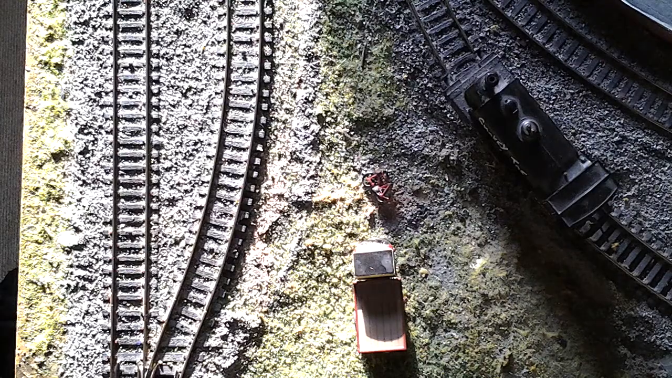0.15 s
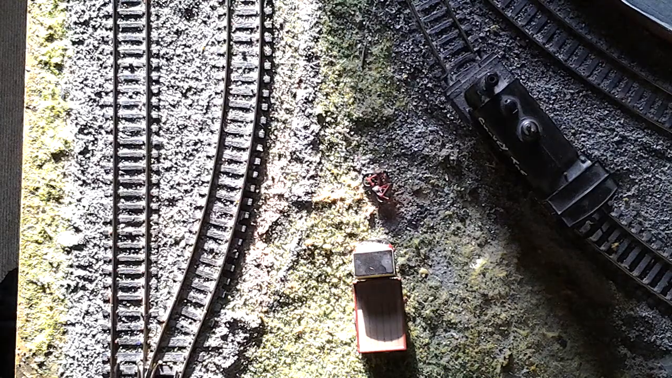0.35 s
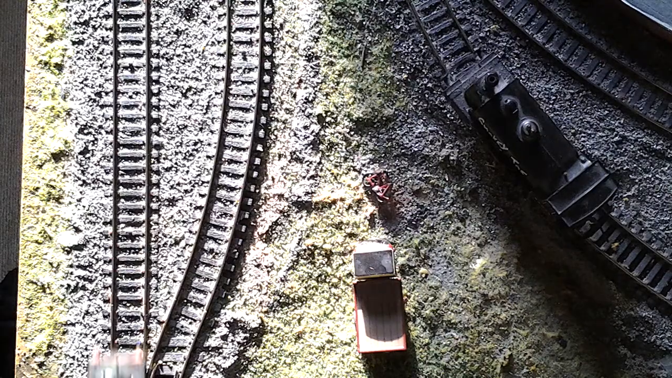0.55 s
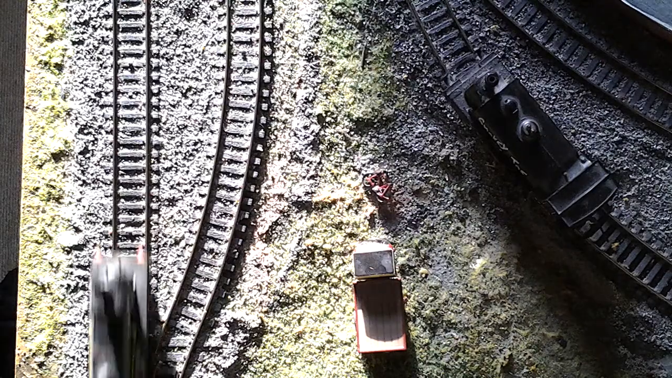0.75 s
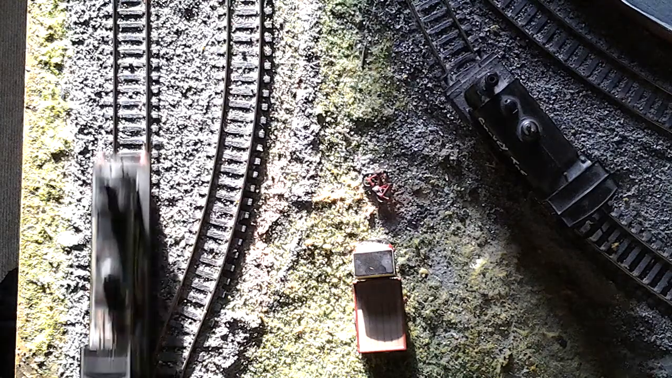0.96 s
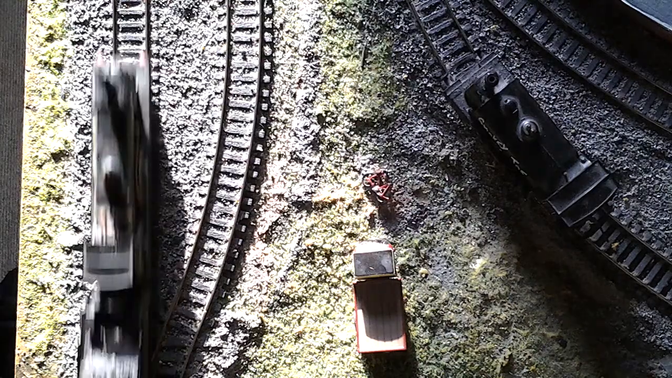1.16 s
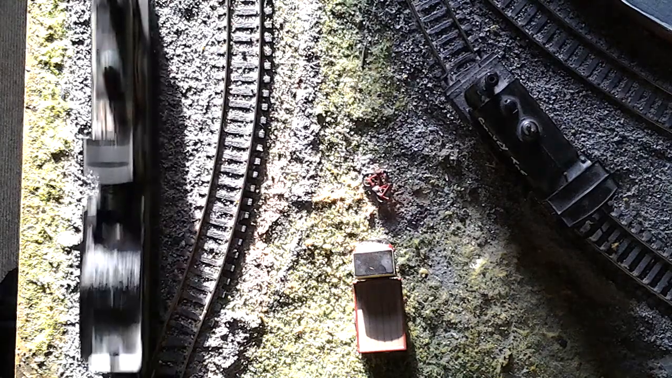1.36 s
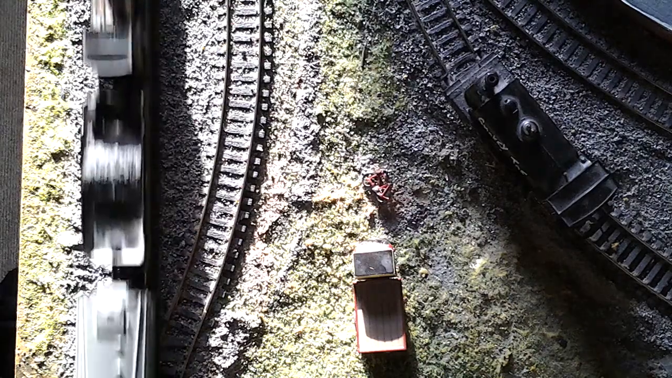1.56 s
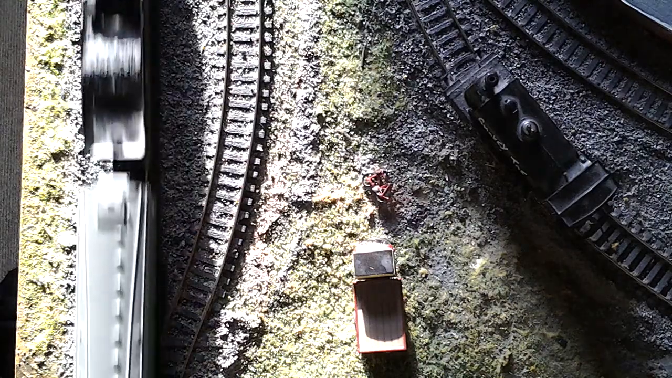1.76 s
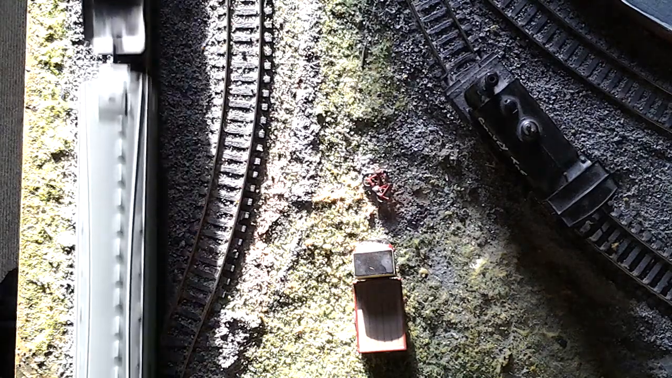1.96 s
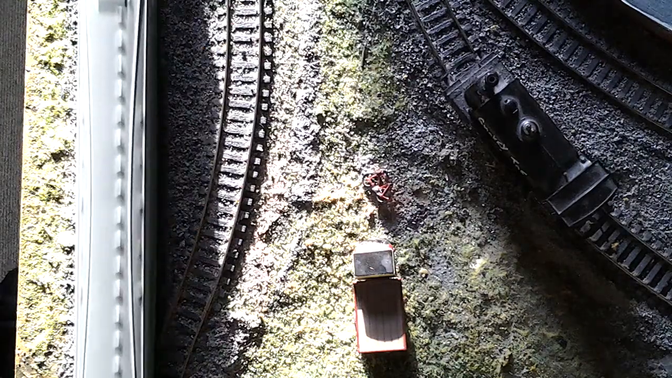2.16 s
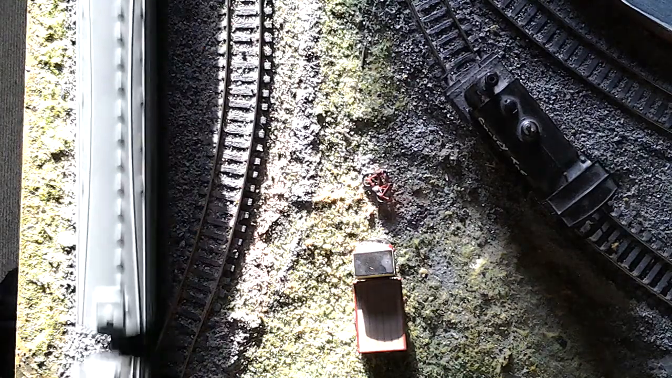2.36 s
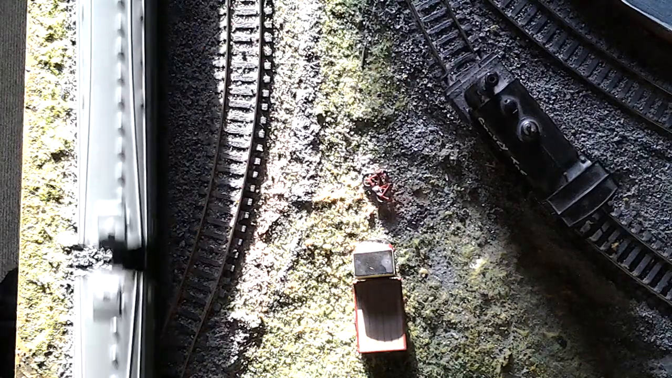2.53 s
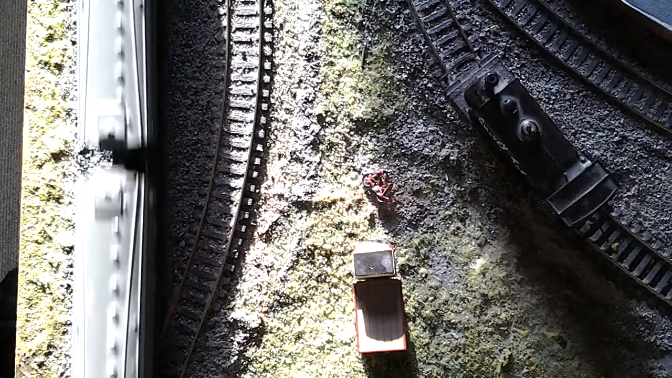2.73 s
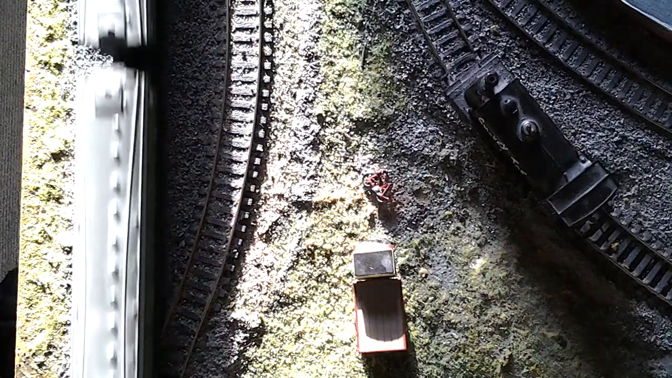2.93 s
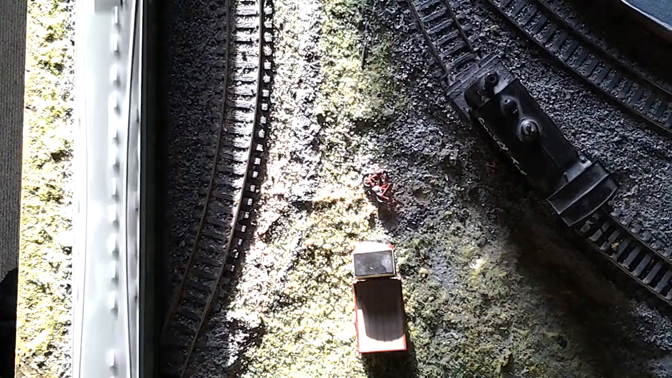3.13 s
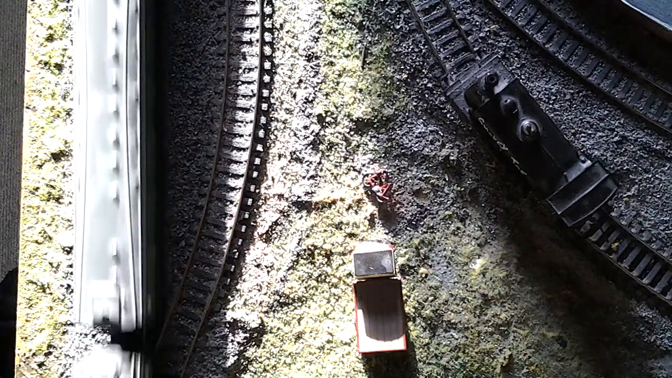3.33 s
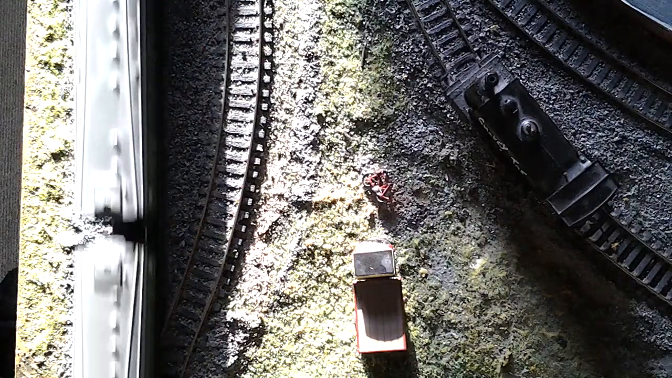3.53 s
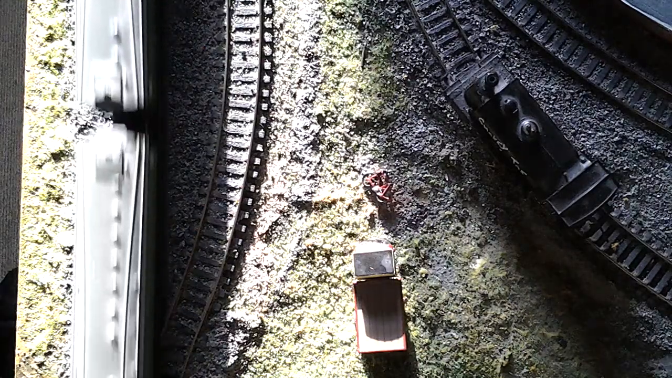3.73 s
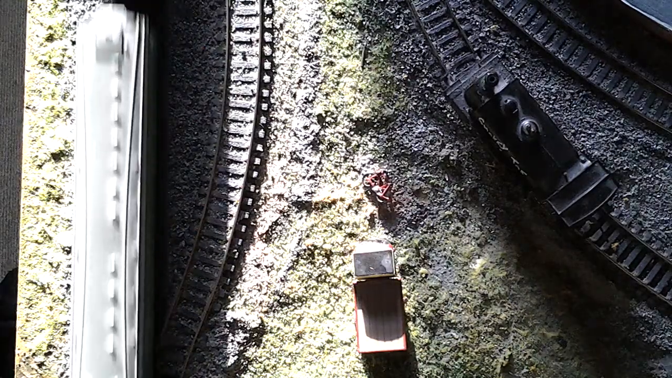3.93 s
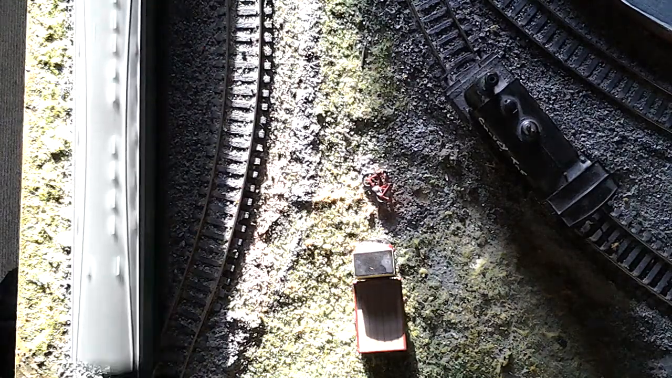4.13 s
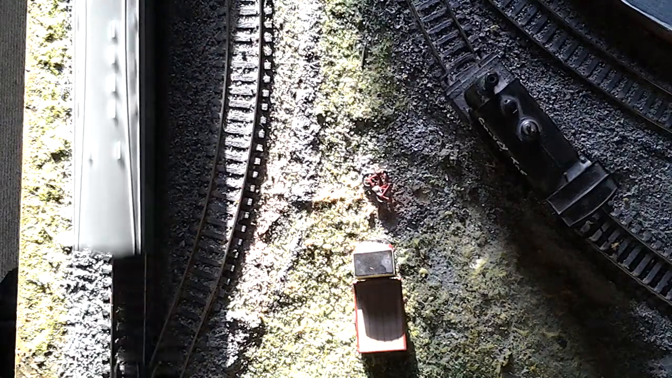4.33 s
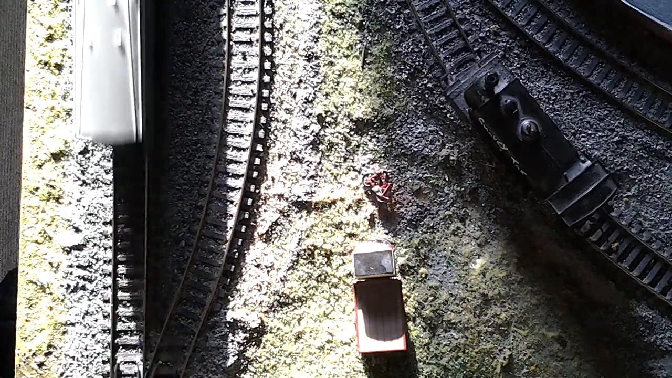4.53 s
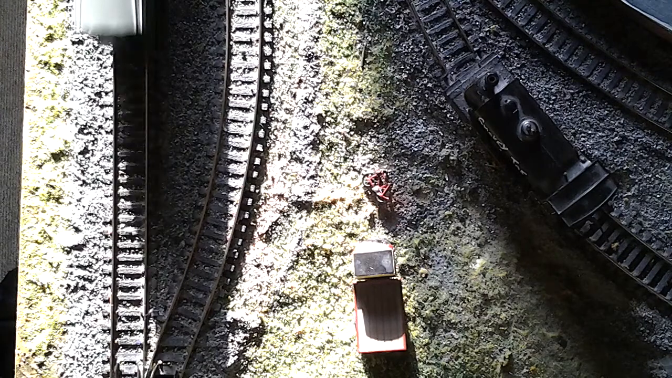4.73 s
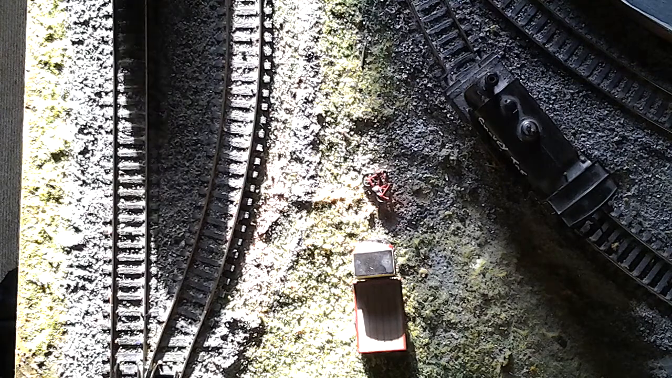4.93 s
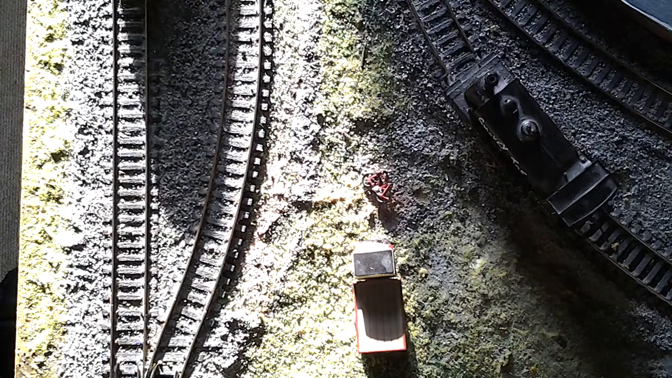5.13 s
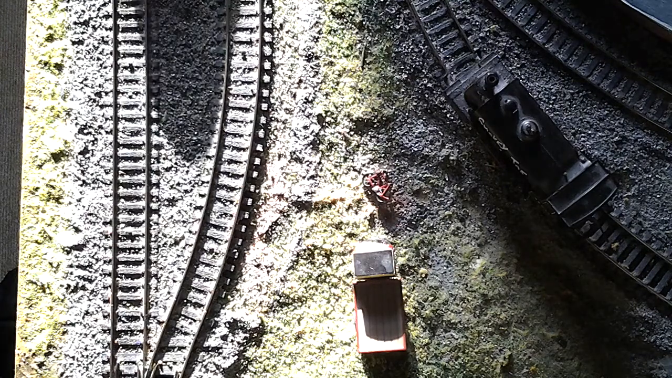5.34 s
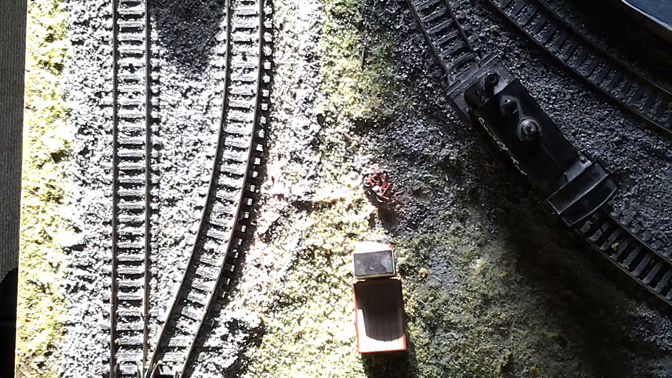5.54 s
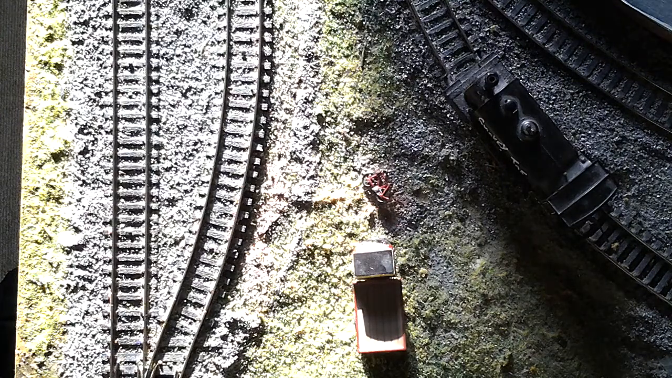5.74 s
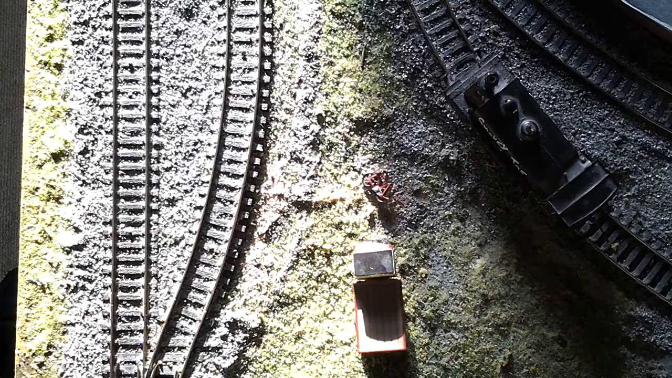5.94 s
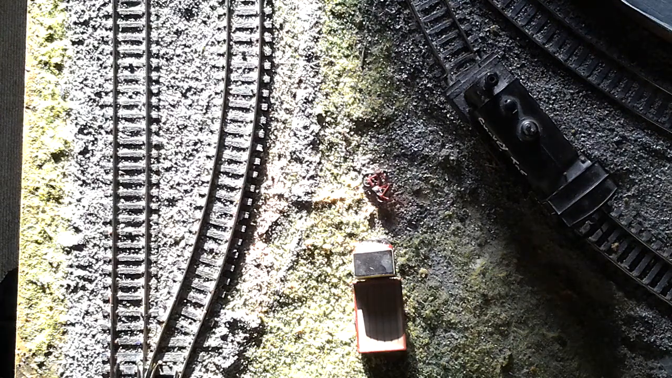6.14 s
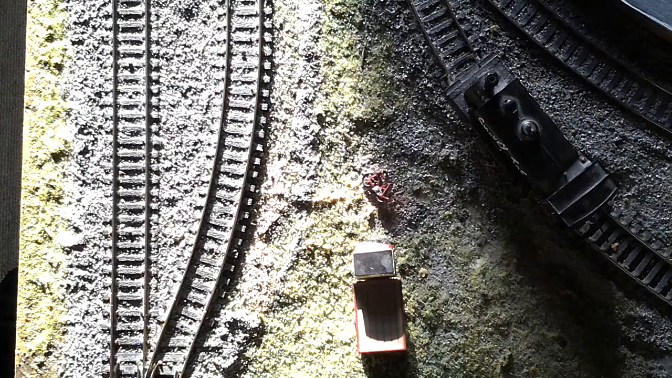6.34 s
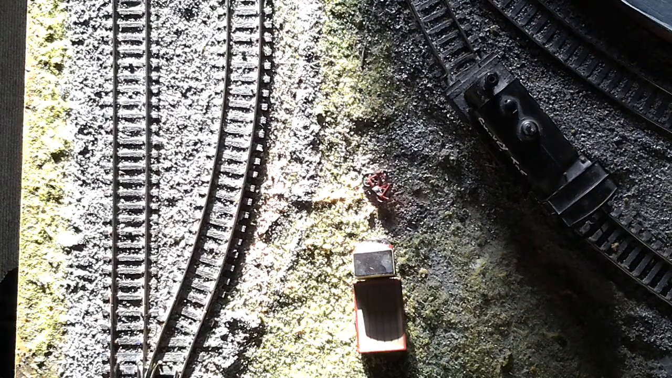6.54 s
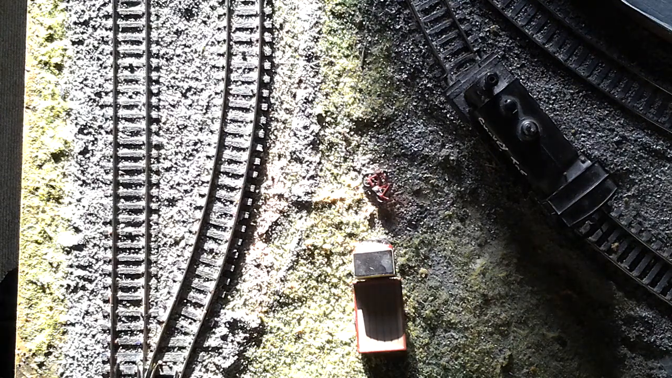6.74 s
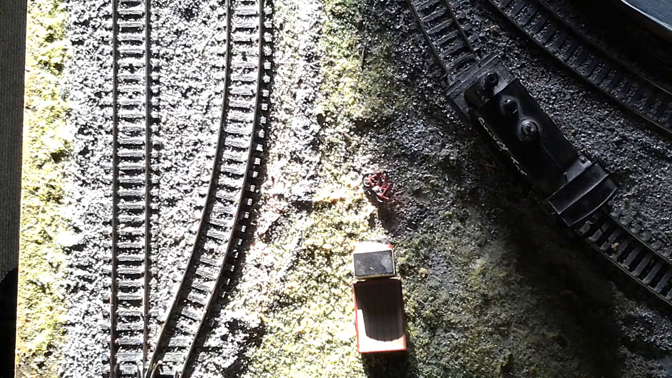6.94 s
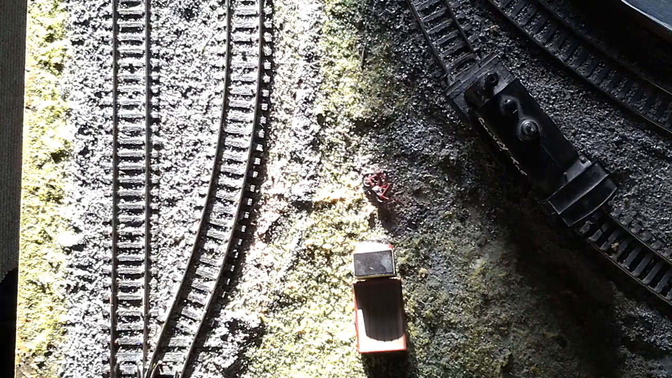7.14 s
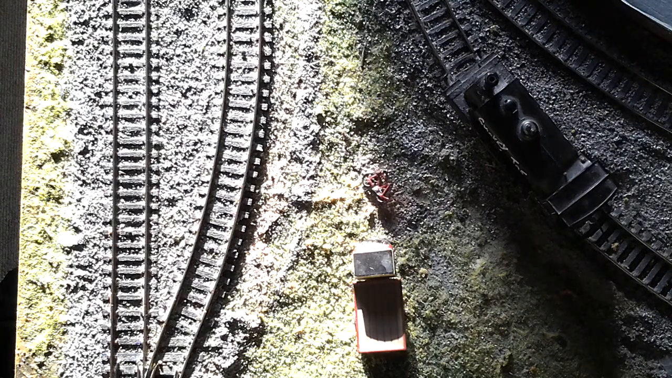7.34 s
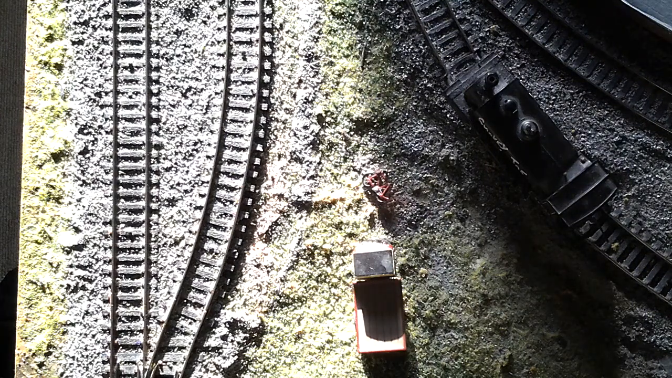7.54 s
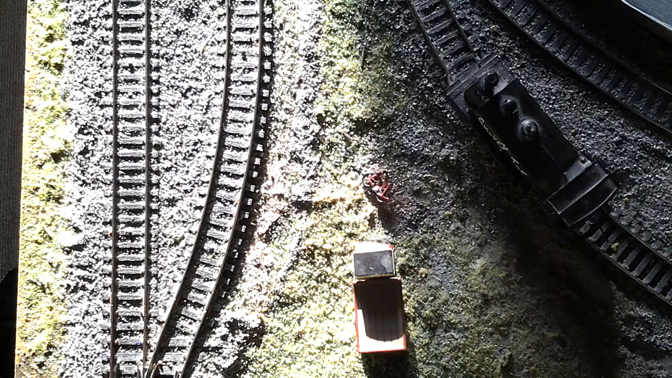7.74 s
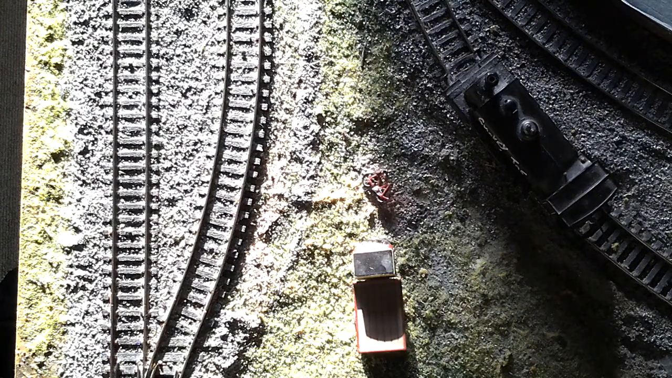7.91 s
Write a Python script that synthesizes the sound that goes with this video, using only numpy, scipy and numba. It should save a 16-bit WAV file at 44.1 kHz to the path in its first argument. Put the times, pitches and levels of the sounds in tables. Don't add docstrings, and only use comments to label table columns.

```python
import sys
import numpy as np
from scipy import signal
from scipy.fft import rfft, irfft, next_fast_len
from scipy.io import wavfile
from scipy.ndimage import uniform_filter1d
from numba import njit

SR = 44100
rng = np.random.default_rng(int(sys.argv[2]) if len(sys.argv) > 2 else 0)


def field_ratio(decibels):
    return 10 ** (np.asarray(decibels, dtype=float) / 20)


def wav_out(sig):
    wavfile.write(sys.argv[1], SR, np.round(np.clip(np.atleast_2d(sig).T, -1, 1) * 32767).astype(np.int16))


N = 356151
END_S = 8.076

# centre_hz, width_hz, level_db
FAR_MODES = [(5570, 2400, 11), (7250, 2600, 0), (9100, 16000, -17)]
# start_s, end_s, pitch_hz, level_db, slide_hz_per_s
FLANGE_SQUEAKS = [
    (0.385, .53, 2470, -38.5, -150),
    (7.93, 8.04, 1900, -44, -2200),
]
# start_s, level_db, ring_hz
JOINT_HOPS = [(0.349, -36, 4200), (0.38, -36, 1930), (0.612, -41, 3800), (0.707, -33, 3800),
              (0.807, -37.5, 1230), (0.851, -36, 4400), (1.248, -32.5, 2680), (1.976, -34, 4620),
              (2.084, -41, 4250), (2.533, -36, 4600), (2.726, -34.5, 756), (3.009, -30.5, 4400),
              (3.041, -31, 3460), (3.053, -29, 5250), (3.61, -29, 1440), (3.945, -33, 2660),
              (4.573, -30.5, 4600), (4.821, -38, 734), (5.862, -35, 3380), (6.307, -37, 4840),
              (6.379, -42, 3270), (6.492, -35, 3330), (6.714, -36, 2090), (6.887, -35, 3220),
              (6.942, -33, 3410), (7.07, -33, 3230), (7.238, -37.5, 5010), (7.637, -40, 4130)]
# start_s, level_db, ring_hz
POINT_RATTLES = [(0.195, -36.5, 4270), (0.335, -39, 1430), (0.374, -34, 5000), (0.458, -36, 4100),
                 (0.709, -45, 1670), (1.459, -38.5, 4500), (1.787, -38, 4800), (2.101, -32, 4640),
                 (2.561, -37, 890), (2.926, -34.5, 830), (3.03, -34, 1940), (3.046, -34, 4600),
                 (3.76, -33, 3850), (3.948, -29.5, 4070), (4.823, -30, 4050), (4.833, -30, 2260),
                 (5.281, -40, 3580), (5.469, -39, 890), (5.67, -39, 3420), (5.827, -35, 3300),
                 (6.015, -36, 3300), (6.341, -36, 3650), (6.726, -33, 3500), (6.899, -40, 2430),
                 (7.246, -38.5, 950), (7.307, -38, 4000), (7.631, -39, 3330), (7.79, -41, 1820),
                 (7.942, -39.5, 3480)]
# start_s, peak_db, ring_hz
RAIL_BLOWS = [(0.6082, -21, 3820), (0.6108, -24, 2880), (0.6075, -27, 1590), (3.042, -24, 1400),
              (3.032, -24, 1900), (0.697, -25, 597), (0.705, -25, 990), (0.735, -27, 1480),
              (0.805, -22, 3920), (1.157, -24, 1290), (1.247, -16, 2700), (1.261, -23, 1800),
              (1.881, -23, 1500), (2.999, -23, 2140), (3.039, -21, 3200), (3.051, -26, 4040),
              (3.943, -24, 2660), (4.002, -21, 2700), (4.79, -16, 1600), (4.817, -14, 700),
              (4.825, -22, 1270), (4.913, -19, 2530), (6.491, -22, 2760), (6.711, -18, 2060),
              (6.886, -31, 3080), (7.461, -25, 2290), (7.59, -23, 2980), (7.790, -22.5, 1850)]
# start_s, peak_db, ring_hz
GAP_TICKS = [(0.452, -19, 1460), (0.706, -25, 1690), (1.345, -24, 759), (1.409, -21, 660),
             (1.463, -16, 3700), (1.713, -21, 670), (1.954, -21, 2620), (2.215, -18, 654),
             (2.682, -16, 2470), (2.918, -22, 966), (3.0, -19, 4320), (3.023, -20, 1650), (3.19, -21, 2100),
             (3.31, -18, 2070), (3.8, -24, 1390), (3.874, -16, 4410), (3.941, -13, 2600),
             (4.111, -15, 2250), (4.201, -22, 1310), (4.481, -18, 2200), (4.647, -23, 2090),
             (4.671, -16, 2530), (4.819, -17, 1280), (5.026, -21, 2560), (5.066, -20, 1560),
             (5.219, -21, 2590), (5.28, -21, 2040), (5.659, -19, 2430), (5.811, -20, 3350),
             (5.963, -18, 1870), (6.006, -31, 2200), (6.073, -31, 1440), (6.683, -27, 2360),
             (6.784, -20, 2100), (6.898, -20, 2570), (7.006, -18, 1800), (7.156, -20, 996),
             (7.545, -24, 2120), (7.624, -22, 2360)]
# time_s, rolling_db, weight_on_board_under_microphone_db
TRAIN_PASS = [(0.0, -40.5, -2.5), (0.5, -40, 0.5), (1.0, -40.5, -1), (1.25, -39.5, 2), (1.6, -38.5, 2.5),
              (2.1, -35.5, 3), (2.8, -35.5, 0), (3.2, -33.5, 2), (3.65, -33.5, 2.5), (4.25, -31.5, 2.5),
              (4.8, -34, 0.5), (5.2, -33.5, -0.5), (5.5, -36.5, -3), (5.95, -36, -1), (6.45, -38.5, -3.5),
              (6.95, -35.5, -4), (7.35, -37.5, -1.5), (8.07, -42, -3.5)]
# time_s, level_over_boom_db
BOARD_JOLTS = [(0.54, 7), (0.97, 9), (1.1, 10.5), (1.24, 11.5), (2.92, -2), (3.59, 9.5), (3.65, 11),
               (3.89, 9), (4.09, 4), (4.79, 10), (5.93, -4), (6.99, -7), (7.33, 2), (7.98, 12)]
# time_s, change_db, half_length_s
TRAIN_SURGES = [(0.343, 3, 0.031), (3.026, 0.5, 0.012), (3.586, -2.5, .02), (3.817, 2, 0.038),
                (3.937, 2.5, 0.052), (4.63, -2.5, 0.024), (6.35, 2.5, 0.068), (6.745, 0.5, 0.034),
                (6.794, 1, .02), (3.035, 1, 0.012), (7.0, -0.5, 0.022), (6.883, 1.5, 0.049),
                (7.023, 1, .05), (7.695, -1.5, 0.065)]
# time_s, tilt_db_per_octave
COACH_FACING = [(0, 2), (.6, -1.5), (1.3, -2), (2, -2), (2.8, 0.3), (3.3, -0.5), (4, 0.3), (4.6, 0.5),
                (5.2, -2.2), (5.8, 1), (6.1, -4), (6.4, 1.5), (6.8, 1), (7.05, -.5), (7.45, 2), (7.65, 2),
                (7.85, -4), (8.07, -7)]
# centre_hz, width_hz, level_db
BOOM_MODES = [(249, 100, -10), (402, 320, -5.5)]
# centre_hz, width_hz, level_db
BOARD_MODES = [(514, 174, -3.5), (643, 110, 2), (779, 161, 3), (998, 147, 0.5)]
# centre_hz, width_hz, level_db
COACH_MODES = [(1082, 138, -4), (1365, 160, 1.5), (1500, 240, 2.5), (1911, 400, 2.5), (2079, 158, 3.5),
               (2430, 383, 1), (2530, 130, 3.5), (2760, 770, 0.5)]
# centre_hz, width_hz, level_db
AXLE_MODES = [(3555, 910, 12), (3850, 90, 9), (4400, 970, 11), (5010, 282, 12), (5250, 460, 8),
              (5940, 2300, -31)]
# frequency_hz, gain_db
MIC_COLOUR = [(60, -55), (140, -3), (250, -2), (5300, 0), (6300, -4), (8000, -9), (10000, -8), (14000, -24)]


def level(x, db):
    return x * field_ratio(db) / np.sqrt(np.mean(x ** 2))


@njit
def band_pass(x, hz, width):
    y, band, low = np.empty(len(x)), 0., 0.
    for i in range(len(x)):
        g, damping = np.pi * hz[i] / SR, width / hz[i]
        g = g + g ** 3 / 3
        v = (band + g * (x[i] - low)) / (1 + g * (g + damping))
        band, low = 2 * v - band, low + 2 * g * v
        y[i] = damping * v
    return y


def walk(rate_hz):
    hold = int(SR / rate_hz)
    steps = np.repeat(rng.standard_normal(N // hold + 1), hold)
    return 1.4 * uniform_filter1d(uniform_filter1d(steps, hold), hold)[:N]


def rail_knocks(per_s, spread_db):
    happens = rng.random(N) < per_s / SR
    hardness = np.minimum(rng.exponential(size=N), 3.4)
    sign = np.sign(rng.standard_normal(N))
    return level(happens * field_ratio(spread_db * hardness) * sign, 0)


def ring(force, modes, drift, flicker_db, tilt=0):
    swell_db = 0.87
    out = 0
    for k, (hz, width, db) in enumerate(modes):
        flicker, wander = walk(22), walk(1.434)
        mode_db = db + tilt * np.log2(hz / 1900) + flicker_db * flicker + swell_db * wander
        own_force = force * field_ratio(mode_db) / np.sqrt(width)
        out = out + (-1) ** k * band_pass(own_force, hz * (1 + drift * wander), 1. * width)
    return level(out, 0)


def room(x, t60_s=0.12, wet_db=-12):
    t = np.arange(int(.3 * SR)) / SR
    tail = uniform_filter1d(rng.standard_normal(len(t)), size=3) * field_ratio(-60 * t / t60_s) * (t > .003)
    return x + signal.fftconvolve(x, tail * field_ratio(wet_db) / np.sqrt(np.sum(tail ** 2)))[:N]


def far_trains():
    return field_ratio(-71) * ring(rng.standard_normal(N), FAR_MODES, drift=0.0061, flicker_db=1.5)


def squeaks(wander=.002, patchy_db=.8):
    t, out = np.arange(N) / SR, 0
    for start, end, hz, db, slide in FLANGE_SQUEAKS:
        gate = np.clip((t - start) / .008, 0, 1) * np.clip((end - t) / 0.067, 0, 1)
        pitch_hz = (hz + slide * (t - start) * gate) * (1 + wander * walk(60))
        tone = np.sin(2 * np.pi * np.cumsum(pitch_hz) / SR)
        out = out + gate * field_ratio(db + patchy_db * walk(47)) * tone
    return out


def blows(hits, crack_db=7.0, trim_db=-4.5, reach=.45):
    attack_s, crack_s, t60_s = .0008, 0.0031, 0.023
    out, t = np.zeros(N + 4096), np.arange(4096) / SR
    rise = np.clip(t / attack_s, 0, 1)
    cracks = rng.standard_normal((len(hits), len(t)))
    for (s, db, hz), crack in zip(hits, cracks):
        mode = np.sin(2 * np.pi * hz * t) * field_ratio(-60 * t / t60_s)
        centre = np.full(len(t), 2500 * (hz / 2500) ** reach)
        width = 1.2 * centre[0]
        crack = band_pass(band_pass(crack * np.exp(-t / crack_s), centre, width), centre, width)
        start = int(s * SR)
        out[start:start + len(t)] += field_ratio(db + trim_db) * rise * (mode + field_ratio(crack_db) * crack)
    return out[:N]


def joints(crossings, length_s, sharpness=4.2, broad_db=3.0, bounce_per_s=1500):
    lead = 2048
    out, t = np.zeros(N + 8192), np.arange(-lead, 4096) / SR
    rise_s, fall_s = 0.41 * length_s + 0.00022, 0.64 * length_s + 0.0017
    shape = np.exp(np.where(t < 0, t / rise_s, -t / fall_s))
    clean_blow = (t == 0) * 5.9 * np.exp(-length_s / 0.028)
    draws = rng.standard_normal((len(crossings), 2, len(t)))
    for (s, db, hz), (size, pick) in zip(crossings, draws):
        bounces = np.abs(pick) < bounce_per_s / SR * 1.25
        burst = shape * size * (0.46 + bounces * 4.5) + clean_blow
        centre = np.full(len(t), 1. * hz)
        narrow = band_pass(burst, centre, hz / sharpness)
        broad = band_pass(band_pass(burst, centre, 0.6 * hz), centre, 0.6 * hz)
        hit = level(narrow, 0) + level(broad, broad_db)
        start = int((s - .15 * length_s) * SR)
        out[start:start + len(t)] += hit * field_ratio(db) * np.sqrt(np.mean(shape ** 2) / np.mean(hit ** 2))
    return out[lead:N + lead]


def track_clatter():
    clatter = joints(JOINT_HOPS, .011) + joints(POINT_RATTLES, .028)
    clatter = clatter + blows(RAIL_BLOWS) + blows(GAP_TICKS, crack_db=4.5, trim_db=-9.5)
    knock = band_pass(np.abs(clatter) * rng.standard_normal(N), np.full(N, 990.), 830.)
    return clatter + knock * field_ratio(-10) * np.std(clatter) / np.std(knock)


def rolling():
    t = np.arange(N) / SR
    s, roll, weight = np.transpose(TRAIN_PASS)
    roll_db, weight_db = np.interp(t, s, roll), np.interp(t, s, weight)
    jolt_db = sum(db * np.exp(-((t - at) / 0.026) ** 2) for at, db in BOARD_JOLTS)
    board_db = -42 + weight_db
    boom_db = -56 + 1.27 * weight_db + jolt_db
    axle_db = -39 + 0.56 * (roll_db + 34.5) + 0.9 * weight_db

    wobble, knock = walk(14), rail_knocks(900, spread_db=5.5)
    boom = ring(rng.standard_normal(N), BOOM_MODES, drift=.03, flicker_db=1.5)
    board_force = (rng.standard_normal(N) + 0.88 * knock) * field_ratio(0.096 * walk(5.5))
    board = ring(board_force, BOARD_MODES, drift=0.0028, flicker_db=0.92)
    coach_force = (rng.standard_normal(N) + 0.39 * knock) * field_ratio(0.2 * wobble)
    facing = np.interp(t, *np.transpose(COACH_FACING))
    coach = ring(coach_force, COACH_MODES, drift=0.0043, flicker_db=0.52, tilt=facing)
    axle_force = (rng.standard_normal(N) + 0.85 * knock) * field_ratio(0.37 * wobble)
    axle = ring(axle_force, AXLE_MODES, drift=0.0028, flicker_db=0.6)

    mix = field_ratio(boom_db) * boom + field_ratio(board_db) * board + field_ratio(roll_db + 1.14) * coach + field_ratio(axle_db) * axle
    mix = mix - 0.35 * band_pass(mix, np.full(N, 1077.), 90.)
    surge_db = sum(db * np.exp(-((t - at) / half) ** 2) for at, db, half in TRAIN_SURGES)
    fade_db = -3.8 * np.exp((t - END_S) / 0.035)
    return mix * field_ratio(surge_db + fade_db)


def scene():
    background = far_trains() + squeaks()
    clatter = room(track_clatter())
    train = room(rolling(), t60_s=.2, wet_db=-15.)
    return np.tile(train + clatter + background, (2, 1))


def low_pass(x):
    return signal.sosfilt(signal.butter(12, 14550, fs=SR, output="sos"), x)


def record(dry, quiet_db=-36, slow_s=0.11, top_hz=8200, edge_hz=900):
    size = next_fast_len(N)
    hz = np.fft.rfftfreq(size, 1 / SR) + 1
    mic_hz, mic_db = np.transpose(MIC_COLOUR)
    heard = rfft(dry, size) * field_ratio(np.interp(np.log(hz), np.log(mic_hz), mic_db))
    top_share = (1 + np.tanh((hz - top_hz) / edge_hz)) / 2
    x = irfft(heard, size)[:, :N]
    top = irfft(heard * top_share, size)[:, :N]
    loudness = np.sqrt(uniform_filter1d(x[0] ** 2, int(slow_s * SR)) + 1e-12) / field_ratio(quiet_db)
    hiss = level(np.diff(rng.standard_normal(N + 1)), -59.5)
    mix = x - top + (top + hiss) / loudness ** .95 - .0002
    mix = mix * (np.arange(N) < END_S * SR)
    return low_pass(mix)


dry = scene()
out = record(dry)
wav_out(out)
```